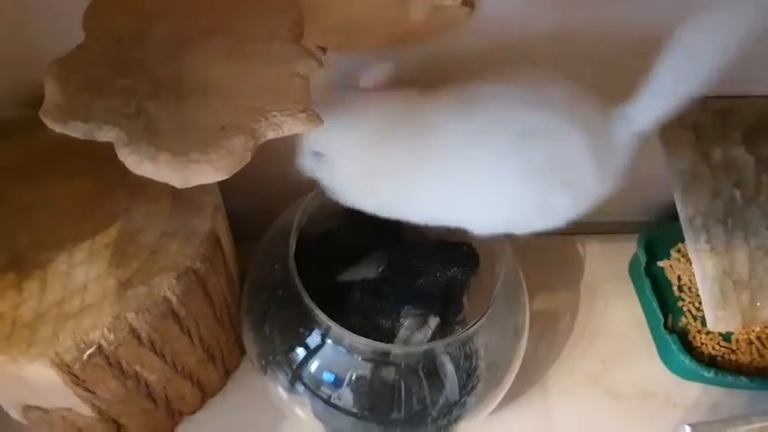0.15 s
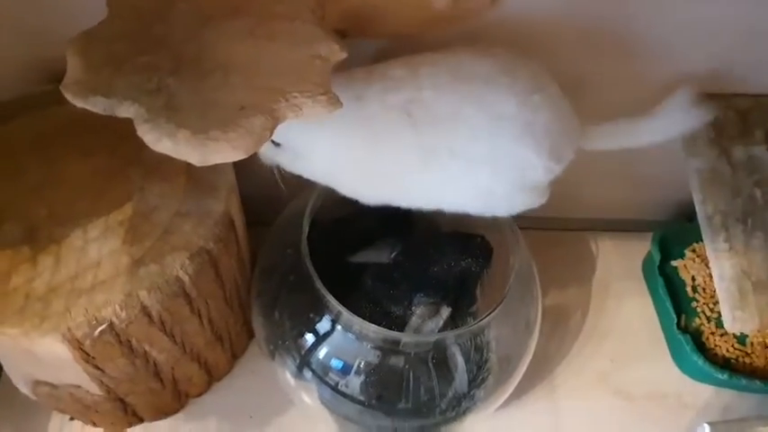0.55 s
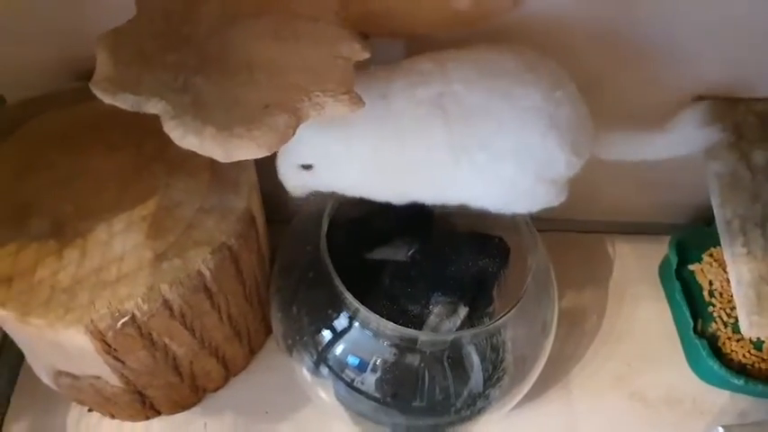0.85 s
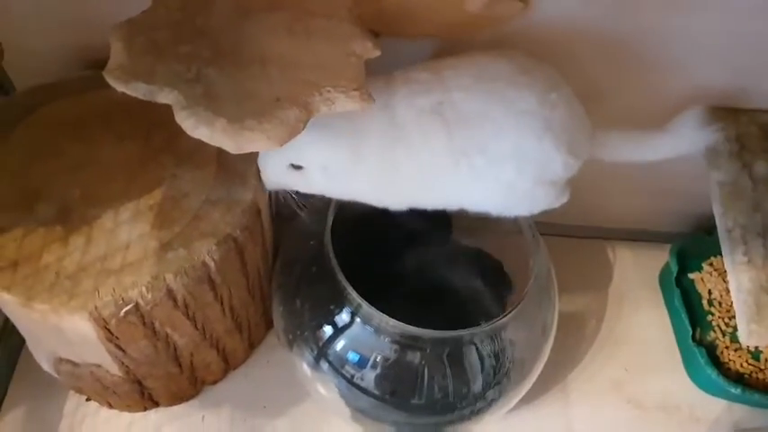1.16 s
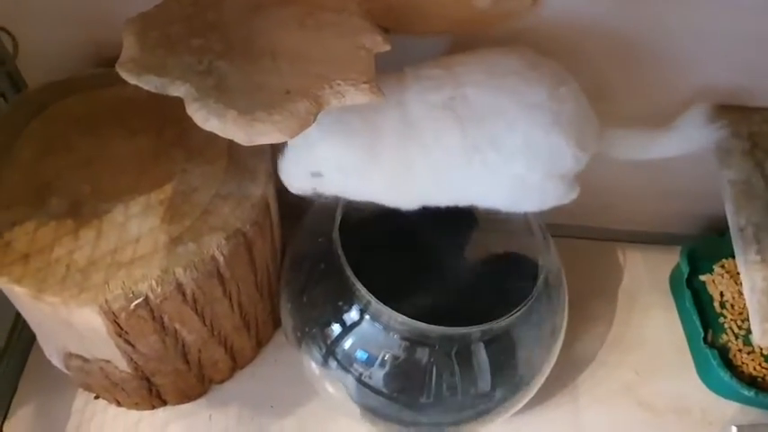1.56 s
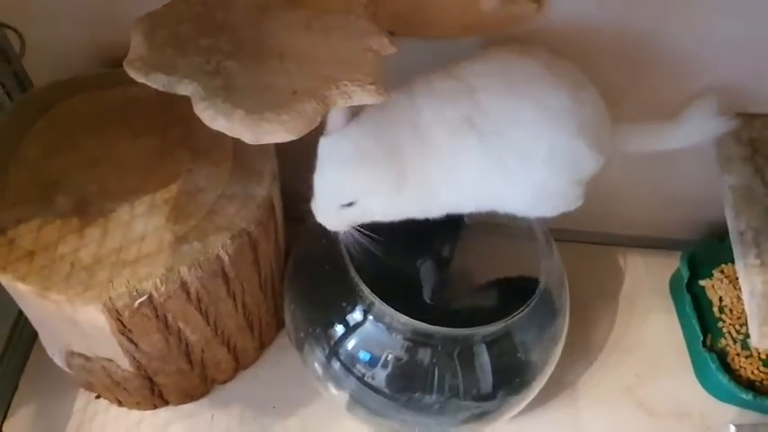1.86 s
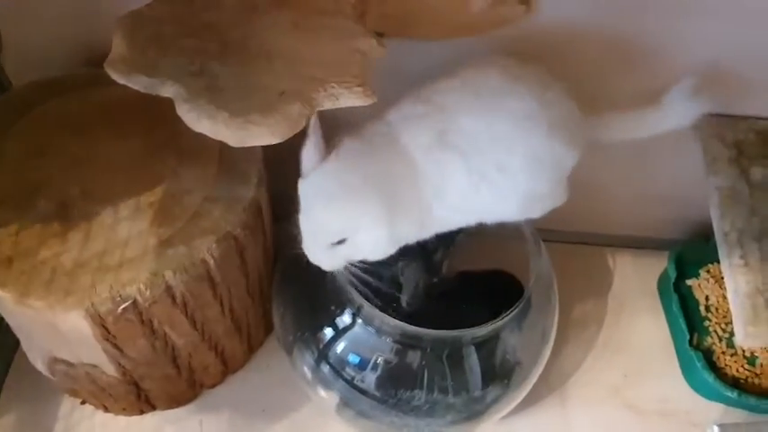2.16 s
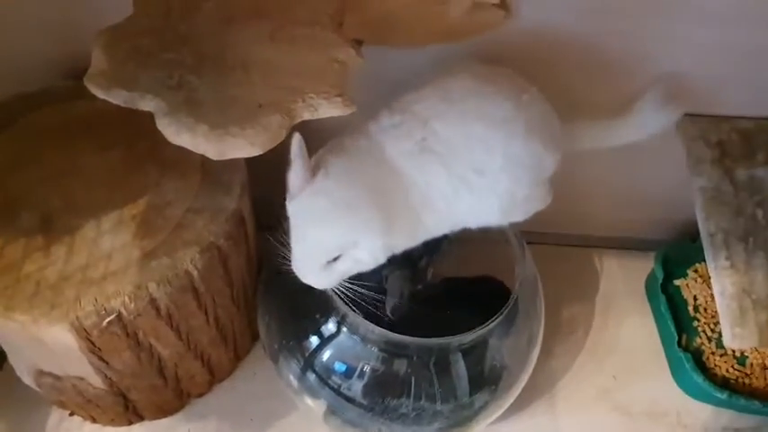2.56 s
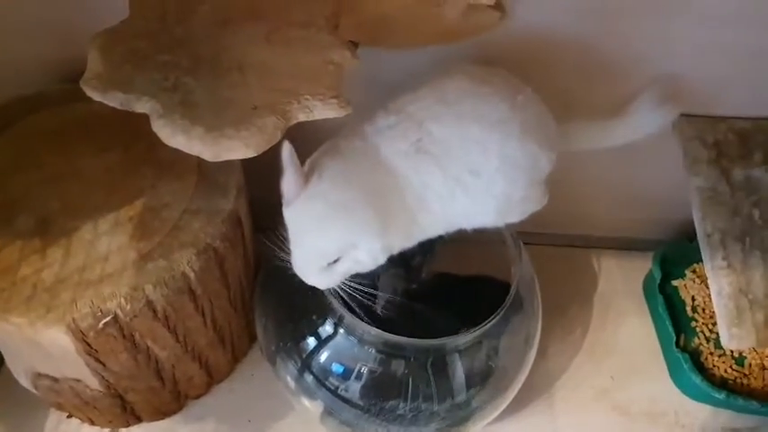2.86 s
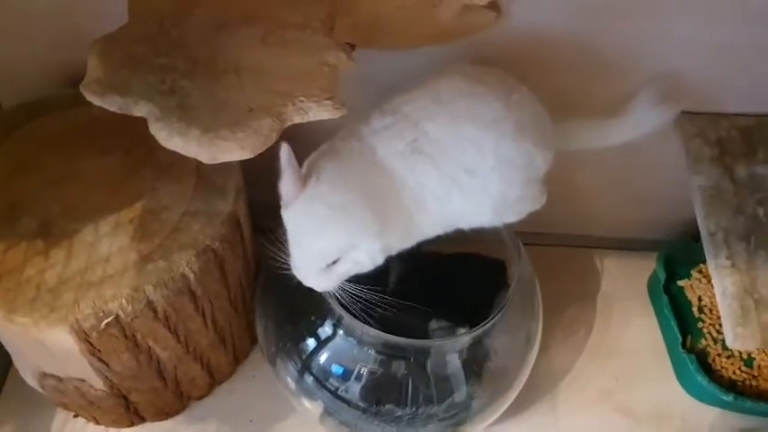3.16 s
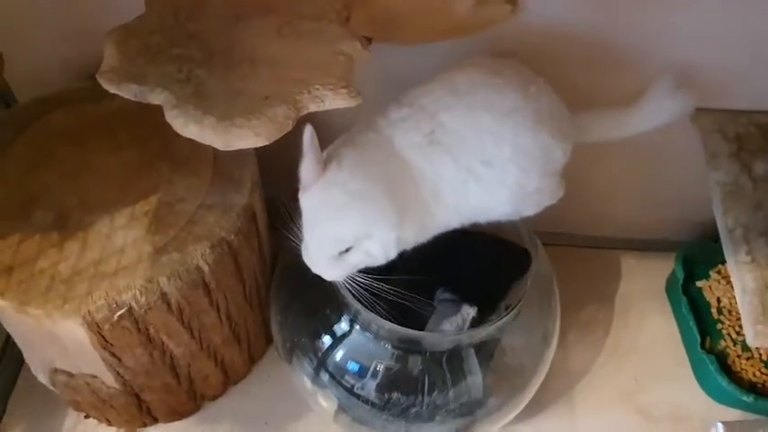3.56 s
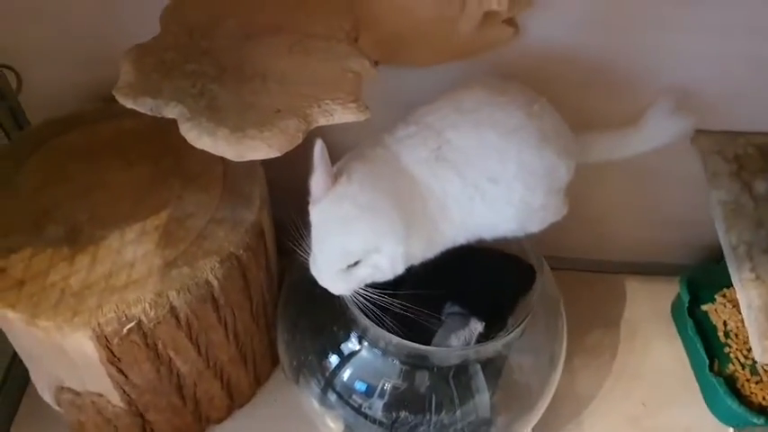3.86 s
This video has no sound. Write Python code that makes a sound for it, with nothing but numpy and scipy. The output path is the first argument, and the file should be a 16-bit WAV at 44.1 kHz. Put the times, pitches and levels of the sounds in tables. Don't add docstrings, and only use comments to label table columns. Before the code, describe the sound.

A hollow knock on a glass bowl comes almost at once, with fur brushing wood, low shelf thuds and glassy rattling until 0.4 s. A soft brush follows, then a few light ticks near 0.9 s. From 1.1 to 1.9 s a chinchilla rolls in dust, hissing grittily on glass, strongest at 1.5, with thuds. Faint ticks and stirring follow; a brush and soft thud end it at 3.9 s over quiet rumble.

```python
import sys
import numpy as np
from scipy import signal
from scipy.io import wavfile
from scipy.ndimage import uniform_filter1d

SR = 44100
rng = np.random.default_rng(int(sys.argv[2]) if len(sys.argv) > 2 else 0)


def to_wav(s):
    ch = np.atleast_2d(s).T
    pcm = np.round(np.clip(ch, -1, 1) * 32767)
    wavfile.write(sys.argv[1], SR, pcm.astype(np.int16))


def natural_amplitude(level_db):
    exponent = np.asarray(level_db, float) / 20
    return 10 ** exponent


N = 176400

# f/Hz, level/dB [per Hz]
FUR_COLOUR = [(940, -31), (1600, -18.5), (5590, 0.5), (9830, -6), (11500, -4.5), (15700, -9)]


def evened(x):
    return x / np.sqrt(np.mean(x ** 2) + 1e-20)


def read(points, hz):
    f, value = np.transpose(points)
    return np.interp(np.log(hz + 1), np.log(f + 1), value)


def swell(s, db, rise, fall, hold=0):
    t = np.arange(N) / SR - s
    before = np.maximum(-t, 0) / abs(rise)
    after = np.maximum(t - hold, 0) / abs(fall)
    return natural_amplitude(db - 20 * np.minimum(before + after, 4) ** 1.4)


def joint(levels):
    return np.sqrt(sum(level ** 2 for level in levels))


def resonate(x, hz, width):
    turn = np.exp(2j * np.pi * hz * np.arange(N) / SR)
    r = np.exp(-np.pi * width / SR)
    smooth = signal.lfilter([1 - r], [1, -r], x / turn)
    return 2 * (turn * smooth).real


def noise(colour, patchy_db, flicker_db, size=512, alike=False):
    # f/Hz, likeness [0 to 1]
    likeness = [(120, 0.9497), (300, 0.6996), (600, 0.6011), (1400, 0)]
    frames, hz = N * 4 // size + 5, np.fft.rfftfreq(size, 1 / SR)
    a, b, c, d, patch = rng.standard_normal((frames, len(hz), 5)).T
    patch = evened(uniform_filter1d(uniform_filter1d(patch, size=6, axis=0), size=10, axis=1))
    flicker = evened(uniform_filter1d(rng.standard_normal(frames), size=3))
    same = np.clip(read(likeness, hz), 0, 1)[:, None] * alike
    left, stray = a + 1j * b, c + 1j * d
    z = np.array([left, same * left + np.sqrt(1 - same ** 2) * stray])
    z *= natural_amplitude(read(colour, hz)[:, None] + patchy_db * patch + flicker_db * flicker)
    sound = signal.istft(z, nperseg=size, noverlap=size * 3 // 4)[1]
    return evened(sound[:, :N])


def panned(x, db):
    return x * natural_amplitude(np.array([[db / 2], [-db / 2]]))


def wobbles(rows, wander, fuzz_db):
    out = np.zeros((2, N))
    for s, db, rise, fall, hz in rows:
        drift = evened(uniform_filter1d(rng.standard_normal((3, N)), size=700))
        pitch = hz * (1 + wander * drift * [[1], [4], [4]])
        turns = np.cumsum(pitch, 1) / SR + rng.random((3, 1))
        tone = np.sqrt(2) * np.sin(2 * np.pi * turns)
        out += swell(s, db, rise, fall) * (tone[0] + natural_amplitude(fuzz_db) * tone[1:])
    return out


def room():
    # f/Hz, level/dB [per Hz]
    rumble_colour = [(12, -16), (20, -10), (92, 2.5), (142, -22.5), (205, -13.5), (261, -20.5), (302, -16),
                     (1600, -43), (2080, -97), (3520, -120)]
    # f/Hz, level/dB
    mains = [(100, -65), (120, -68), (200, -77), (300, -72.5), (400, -85)]
    # f/Hz, level/dB [per Hz]
    hiss_colour = [(760, -47), (1300, -3), (3880, -4.5), (4940, -9.5), (5890, 3), (8140, -11), (15700, -16)]
    t = np.arange(N) / SR
    hum = sum(natural_amplitude(db) * np.sqrt(2) * np.sin(2 * np.pi * (hz * t + rng.random())) for hz, db in mains)
    rumble = natural_amplitude(-52.5) * noise(rumble_colour, patchy_db=0, flicker_db=0, size=4096, alike=True)
    hiss = natural_amplitude(-80.5 + 3.5) * noise(hiss_colour, patchy_db=2, flicker_db=0)
    return rumble + hum + hiss


def shelf():
    # peak t/s, level/dB, 20 dB rise/s
    sways = [(.04, -41, .17), (.14, -32, .065), (.215, -29, .06), (.25, -33, .05), (.33, -41, .07),
             (.39, -40, .05), (.46, -43, .08), (.6, -43, .15), (.76, -42, .15), (.92, -43, .09),
             (.98, -40, .07), (1.11, -40, .08), (1.225, -37, .09), (1.34, -41, .055), (1.435, -32, .055),
             (1.525, -28, .06), (1.65, -35, .13), (1.78, -39, .05), (1.835, -33, .05), (1.89, -40, .08),
             (1.99, -38, .07), (2.12, -44, .07)]
    # peak t/s, level/dB, 20 dB rise/s, f/Hz
    landings = [(0.057, -56.5, 0.2615, 200.5), (.068, -36, 0.0188, 338.4), (0.081, -42, 0.1506, 246.4),
                (0.132, -37.5, 0.0727, 121), (0.181, -32, 0.0047, 188.5), (.7, -57, -0.1627, 150),
                (1.03, -61, 0.3177, 200), (.21, -49.5, 0.2041, 129.7), (1.23, -53.5, 0.085, 135),
                (1.25, -53, 0.1506, 110), (1.367, -49.5, 0.0995, 120), (1.426, -37, 0.02, 170),
                (1.442, -36, 0.0327, 95), (1.486, -35.5, 0.0512, 215), (1.505, -30, 0.0255, 160),
                (1.836, -44, 0.1052, 130), (1.679, -51, 0.18, 152), (2.03, -49.5, 0.086, 220),
                (3.978, -56.5, 0.2743, 130)]
    # peak t/s, level/dB, rise/s, fall/s, f/Hz
    air_booms = [
        (.062, -21, .013, .032, 517),
        (.082, -30, .02, .02, 517),
        (.116, -44, .015, .02, 520),
        (.152, -46, .015, .04, 545),
        (.195, -50, .03, .04, 520),
        (.46, -58, .05, .05, 560),
        (1.445, -49, .02, .02, 545),
        (1.503, -40, .03, .045, 465),
        (.61, -67, .06, .09, 980),
    ]
    # f/Hz, level/dB
    scuff_colour = [(150, -23), (300, 0.5), (540, 7), (900, -8.5), (1400, -16), (2200, -20.5), (4000, -31)]
    thuds = [(s, db, rise, 1.4 * rise, hz) for s, db, rise, hz in landings]
    sway = joint(swell(s, db - 2, rise, 1.1 * rise) for s, db, rise in sways)
    rubbing = joint(swell(*row[:4]) for row in thuds) + natural_amplitude(-10.5) * sway
    scuff = natural_amplitude(-15) * rubbing * noise(scuff_colour, patchy_db=3, flicker_db=0.8228, alike=True)
    board_hz = 57
    board = sway * wobbles([(0, 0, 1, 1e6, board_hz)], .16, fuzz_db=-24)
    booms = wobbles(air_booms, .025, fuzz_db=-16)
    return scuff + booms + wobbles(thuds, 0.24, fuzz_db=-7.0) + board


def fur():
    # start of hold t/s, level/dB, rise/s, hold/s, fall/s, extra treble/dB
    brushes = [
        (0.049, -55.5, 0.0225, 0.0039, 0.02054, -9.5),
        (0.115, -53, 0.01249, 0.0501, 0.04884, -2.5),
        (.26, -62, 0.00953, 0.0224, 0.0486, -6),
        (0.471, -59.5, 0.1553, 0.1911, 0.15404, 1),
        (0.994, -73, 0.01382, 0.00934, 0.0241, -4.5),
        (3.926, -47.5, 0.017323, 0.04192, 0.07666, 2),
    ]
    # peak t/s, level/dB, rise/s, fall/s
    stirs = [
        (2.32, -71.5, 0.0825, 0.04268),
        (2.44, -79, 0.1522, 0.093),
        (2.62, -77, 0.04036, 0.0654),
        (2.815, -64.5, 0.02836, 0.0626),
        (2.855, -62.5, 0.03954, 0.0665),
        (3.02, -87, 0.0508, 0.0513),
        (3.405, -69, 0.1013, 0.1764),
        (3.53, -72.5, 0.2307, 0.1991),
        (3.7, -76, 0.0302, 0.0561),
    ]
    # f/Hz, level/dB [per Hz]
    stir_colour = [(2000, -29.5), (3500, -25.5), (4900, -11), (5900, -2), (6600, 1.5), (8000, -5.5),
                   (11000, -12), (15700, -23)]
    level = joint(swell(s, db, rise, fall, hold) for s, db, rise, hold, fall, _ in brushes)
    top = joint(swell(s, db + top_db, rise, fall, hold) for s, db, rise, hold, fall, top_db in brushes)
    swish = noise(FUR_COLOUR, patchy_db=1.2, flicker_db=0)
    body = signal.sosfiltfilt(signal.butter(2, 8500, fs=SR, output="sos"), swish)
    stir = joint(swell(*row) for row in stirs) * noise(stir_colour, patchy_db=3.5, flicker_db=2.0)
    return panned(level * body + top * (swish - body), -0.5) + panned(stir, -3.5)


def rattle():
    # t/s, level/dB, extra of low modes/dB, extra of high modes/dB
    foot_ticks = [(.03, -47, -26, -5.5), (0.045, -38, -19.5, -6), (.053, -47, -1.5, -8.5),
                  (0.076, -51, -5.5, -14.5), (0.117, -43, 4, 4), (0.127, -42.5, -0.5, -2.5),
                  (0.144, -33.5, 1.5, -2.5), (.152, -36.5, -4, -6.5), (.165, -40.5, 3.5, 0),
                  (0.177, -36, -3.5, -0.5), (0.188, -46.5, -4, -7.5), (.197, -47.5, -0.5, 6.5),
                  (.21, -49, -5.5, -0.5), (.226, -56.5, -1.5, -1.5), (0.252, -59.5, 6.5, 8.5),
                  (.271, -63.5, 11, 4), (.324, -50.5, 1, -2.5), (0.334, -49.5, -8, -9),
                  (0.363, -48.5, -4, 3.5), (.373, -49.5, 2, 6), (.39, -59.5, 2, -10.5),
                  (0.824, -52, -13, 2.5), (.838, -54, -13, -0.5), (.859, -52.5, -4, -4.5),
                  (.88, -63.5, 3, 2.5), (0.973, -66, -13.5, 2.5), (0.985, -59, -16.5, 7),
                  (0.991, -62, -8.5, 10), (.999, -55.5, 1, 6), (1.019, -63, 10, 5.5),
                  (1.033, -67.5, 2.5, 3), (1.937, -52, -1, -8.5), (1.971, -62, -1, 2.5),
                  (2.002, -67, 12, 0.5), (2.023, -58.5, 0, 0.5), (2.087, -63.5, -7.5, 7),
                  (2.095, -52.5, 0, 2.5), (2.112, -67.5, 0.5, 0.5), (2.155, -66.5, 1, 2)]
    # f/Hz, width/Hz, level/dB
    modes = [(1677, 26, -12), (3145, 28, -6), (3245, 40, -12), (4388, 20, -1), (4450, 30, -3),
             (4725, 20, -6), (5485, 26, -1), (6362, 26, -8), (6510, 30, -11), (7270, 34, -12),
             (8365, 40, -12), (9800, 40, -19), (11890, 40, -15), (13700, 45, -19)]
    spread_db, contact_hz = 2, 190
    s, db, low_db, high_db = np.transpose(foot_ticks)
    share = rng.standard_normal((len(s), len(modes), 2))
    lag = rng.random((len(s), len(modes), 2))
    out = np.zeros((2, N))
    for k, (hz, width, mode_db) in enumerate(modes):
        size = natural_amplitude(db + mode_db + low_db * (hz < 3500) + high_db * (hz > 5000))
        size = size[:, None] * natural_amplitude(spread_db * np.clip(share[:, k], -1.5, 1.5))
        ticks = np.zeros((2, N))
        start = (SR * (s[:, None] + lag[:, k] / hz)).astype(int)
        np.put_along_axis(ticks, start.T, size.T, 1)
        rocking = natural_amplitude(3 * evened(uniform_filter1d(rng.standard_normal(N), size=250)))
        ring = resonate(resonate(ticks, hz, contact_hz), hz, width)
        out += rocking * ring * SR / (4 * np.pi * width)
    grit = joint(swell(t, peak_db - 13, 0.001938, .02) for t, peak_db in zip(s, db + high_db / 2))
    return panned(out + grit * noise(FUR_COLOUR, patchy_db=8, flicker_db=-0.2423), -4)


def knock():
    # f/Hz, level/dB
    wall_modes = [(652, 3), (705, -3), (786, 2), (1151, -12.5), (1400, -0.5), (1638, -4.5), (2466, -6)]
    t60 = 0.0669
    blow = swell(0.051748, -39, 0.001886, 0.039294, 0.00176) * rng.standard_normal((2, N))
    ring = sum(natural_amplitude(db) * resonate(blow, hz, 2.0896 / t60) for hz, db in wall_modes)
    clack = resonate(resonate(blow, 1254.3, 2356), 1254.3, 2136.4)
    return ring * np.sqrt(t60 * SR / 20) + natural_amplitude(3.5) * clack


def dust():
    # peak t/s, level/dB, 20 dB rise/s, 20 dB fall/s
    flings = [(1.105, -78.5, 0.5871, -0.0011), (1.145, -62.5, 0.1214, 0.0294),
              (1.19, -59.5, 0.0495, 0.1315), (1.232, -54.5, 0.0777, 0.1253), (1.34, -57, 0.0359, 0.0914),
              (1.39, -45, 0.068, 0.0607), (1.458, -46.5, 0.0353, 0.0816), (1.523, -38, 0.0189, 0.0773),
              (1.577, -46, 0.0307, 0.0799), (1.628, -45.5, 0.0259, 0.0584), (1.683, -48.5, -0.0083, 0.0747),
              (1.742, -47.5, 0.0474, 0.0676), (1.793, -47, -0.0331, 0.0589), (1.838, -41, 0.0252, 0.0622),
              (1.873, -46, 0.0009, 0.0607), (1.935, -65, 0.0888, 0.0582), (2.015, -61.5, 0.1457, 0.025),
              (2.1, -69, 0.2693, 0.0575)]
    # f/Hz, level/dB [per Hz]
    dust_colour = [(710, -54), (1200, -31.5), (2340, -23.5), (2900, -19.5), (3480, -17.5), (3960, -6.5),
                   (6800, 0.5), (11500, -8), (15700, -13)]
    # f/Hz, level/dB
    singing = [(2920, -19), (3200, -23), (3900, -17), (4720, -14), (5690, -14), (6050, -16), (6430, -14),
               (6660, -11), (7750, -16), (8440, -15), (11100, -18), (11980, -16)]
    level = joint(swell(*row) for row in flings)
    settling = np.sqrt(resonate(level ** 2, 0, 4.653) / 2)
    level = joint([level, natural_amplitude(-16.5) * settling])
    hits = np.minimum(rng.exponential(1, (2, N)), 5)
    hiss = evened(noise(dust_colour, patchy_db=-2.31, flicker_db=-0.3496) * natural_amplitude(1.503 * hits))
    grains = noise([(20, 0), (SR, 0)], patchy_db=4, flicker_db=0)
    for hz, db in singing:
        width = .07 * hz
        hiss = hiss + natural_amplitude(db) * evened(resonate(resonate(grains, hz, width), hz, width))
    core = hiss
    for _ in range(3):
        core = resonate(core, 7600, 7000)
    wide = np.clip(1 + 0.02254 * (20 * np.log10(level) + 57), .03, 1)
    hiss = core + wide * (hiss - core)
    hiss = signal.sosfilt(signal.butter(2, 1800, "high", fs=SR, output="sos"), hiss)
    hiss = natural_amplitude(2.5) * level * evened(hiss)
    top = signal.sosfiltfilt(signal.butter(2, 10500, "high", fs=SR, output="sos"), hiss)
    return panned(hiss - top, -3.5) + natural_amplitude(1.841) * panned(top, 0.659)


def scene():
    return room() + shelf() + fur() + rattle() + knock() + dust()


def low_pass(x):
    return signal.sosfilt(signal.butter(12, 15800, fs=SR, output="sos"), x)


def record(dry):
    dry = signal.sosfiltfilt(signal.butter(40, 15700, fs=SR, output="sos"), dry)
    return low_pass(dry)


dry = scene()
out = record(dry)
to_wav(out)
```